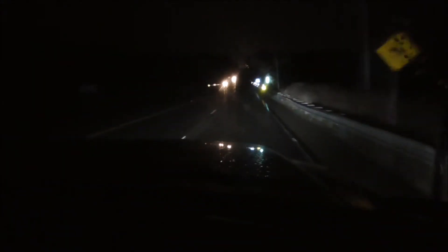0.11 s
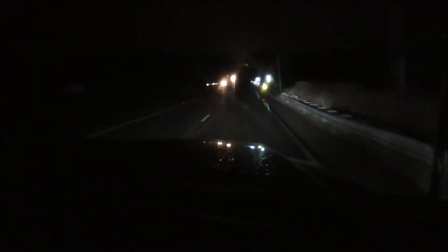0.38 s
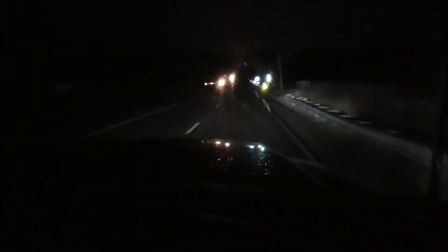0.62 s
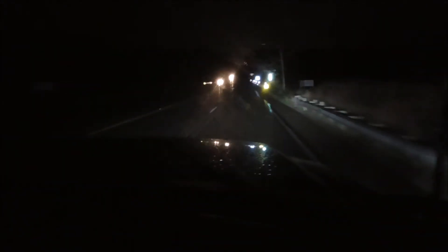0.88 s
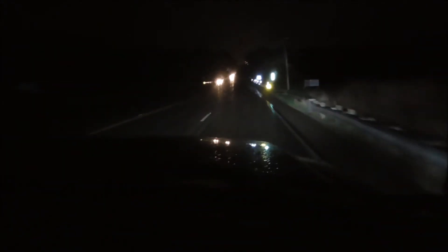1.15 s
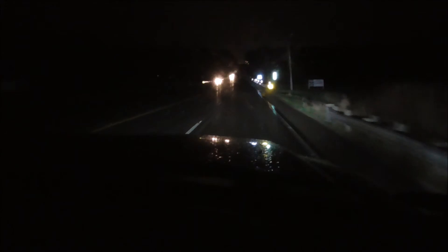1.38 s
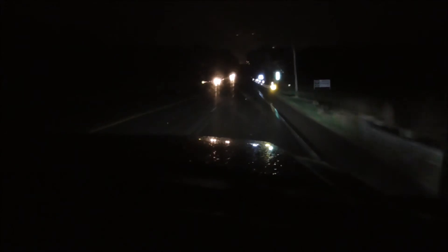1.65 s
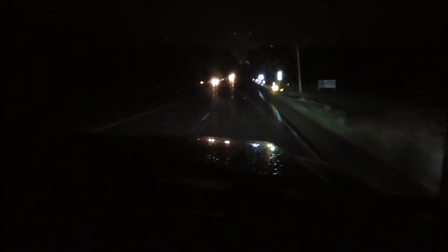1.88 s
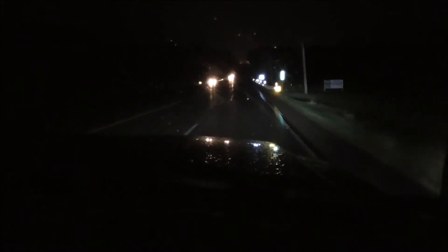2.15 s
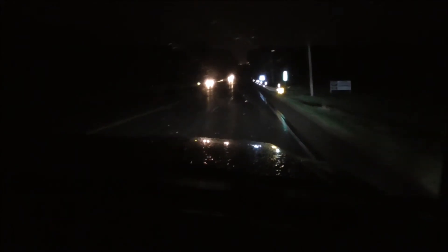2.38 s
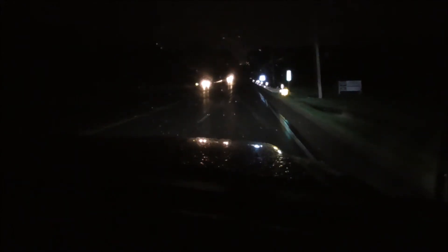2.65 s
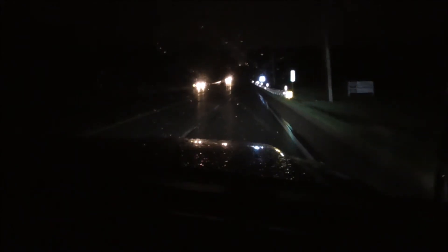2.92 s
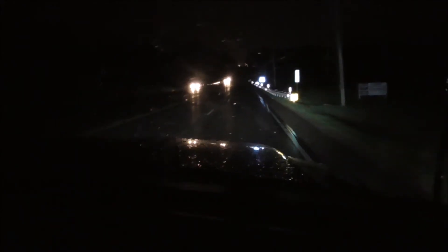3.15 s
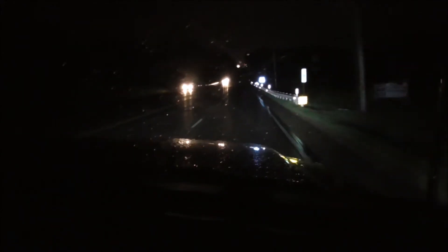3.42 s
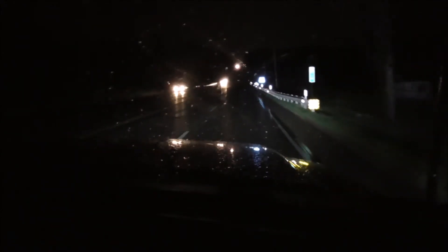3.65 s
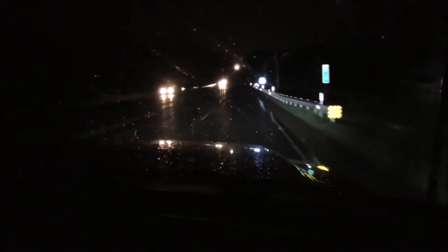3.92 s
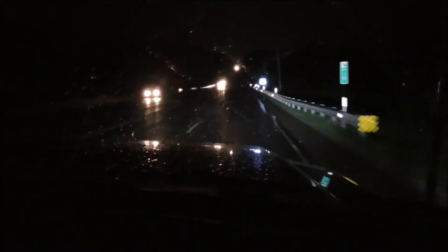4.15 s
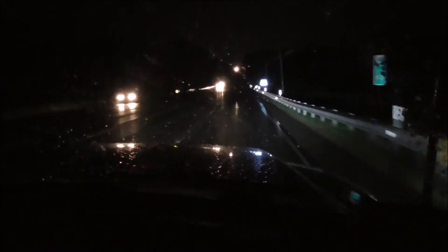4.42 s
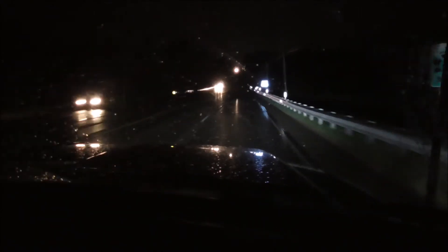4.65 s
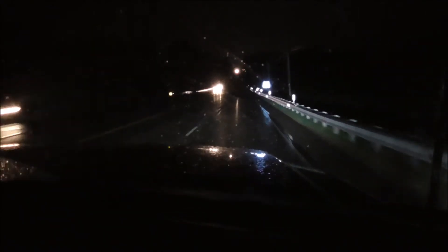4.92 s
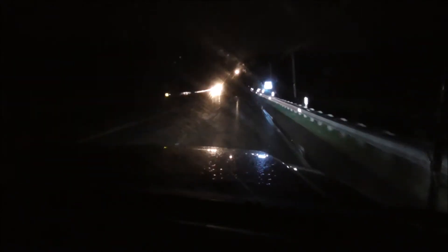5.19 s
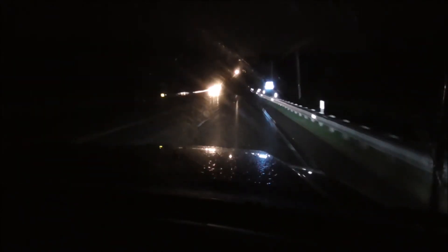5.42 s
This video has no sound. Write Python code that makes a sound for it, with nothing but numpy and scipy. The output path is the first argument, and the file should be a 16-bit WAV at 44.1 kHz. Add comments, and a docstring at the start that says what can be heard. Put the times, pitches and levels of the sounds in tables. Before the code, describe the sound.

Heard from inside a pickup cab with a close stereo microphone, a diesel pulls hard uphill. Its thick, steady drone rises very slightly, then slides down about a tone near four seconds as the gearbox shifts up. Low tyre rumble and soft wet-road hiss lie underneath, with one dull bump early on.

```python
"""Inside a pickup cab on a wet road, two microphone ports: a V8 diesel pulls a load uphill and shifts up.
The exhaust drones on the firing note and its cycle orders, sines that drop in pitch at the shift.
The driveline hums in sines at road speed; the turbo whistles and a squeak are thin wavering sines.
Under the floor tyres rumble and hiss in coloured stereo noise, with short splashes; one soft bump booms."""
import sys
import numpy as np
from scipy import signal
from scipy.fft import rfft, irfft
from scipy.io import wavfile
from scipy.ndimage import uniform_filter1d

SR = 44100
rng = np.random.default_rng(int(sys.argv[2]) if len(sys.argv) > 2 else 0)


def transcribe(u):
    """Save the signal u as a 16-bit wav file named by the first command-line argument.

    u: samples, shape (n,) or (channels, n), limited to [-1, 1]; the rate is SR.
    q: integer samples, one column per channel.
    """
    v = np.clip(np.atleast_2d(u).T, -1, 1)
    q = np.round(v * 32767).astype(np.int16)
    wavfile.write(sys.argv[1], SR, q)


def elevation(decibels):
    """Turn decibel levels (scalar or array-like) into linear amplitude ratios."""
    levels = np.asarray(decibels, float)
    return 10 ** (levels / 20)


N = 244755


def in_time(rows):
    """Table columns as curves, sample by sample."""
    s, *columns = np.transpose(rows)
    return [np.interp(np.arange(N) / SR, s, c) for c in columns]


def at_hz(points, hz):
    """Read a spectrum on a log-frequency axis."""
    points = np.array(points, float)
    log_hz = np.log(np.maximum(hz, 1))
    return np.interp(log_hz, np.log(np.maximum(points[:, 0], 1)), points[:, 1])


def drift(rate):
    """Random wander of spread 1: noise through two equal poles at `rate` Hz, one value per 40 samples."""
    r = np.exp(-80 * np.pi * rate / SR)
    noise = rng.standard_normal(N // 40 + 2002)
    slow = signal.lfilter([1], [1, -2 * r, r * r], noise)[2000:]  # leave out the filter's start
    slow = (slow - slow.mean()) / slow.std()
    return np.interp(np.arange(N) / 40, np.arange(len(slow)), slow)


def tone(phase, db, pan_db, lead):
    """A sine of given rms level, split in level and phase between the two microphone ports."""
    side = np.array([[.5], [-.5]])
    start = rng.uniform(0, 2 * np.pi)
    return np.sqrt(2) * elevation(db) * elevation(pan_db * side) * np.sin(phase + start + lead * side)


def gliding(hz, db, waver_db, waver_rate, wobble_hz, pan_db, lead):
    """A tone that follows its pitch and level curves, wavering a little in both."""
    phase = 2 * np.pi * np.cumsum(hz + wobble_hz * drift(waver_rate)) / SR
    return tone(phase, db + waver_db * drift(waver_rate), pan_db, lead)


# noise likeness of the left and right ports: [f/Hz, likeness 0 to 1]
LIKENESS = [(30, .99), (130, .995), (340, .92), (520, .66), (700, .65), (1400, .68), (3000, .66),
            (4500, .62), (6000, .3), (7500, .4), (9000, .4), (12000, .25)]
# phase of the left port ahead of the right: [f/Hz, lead/rad]
LEAD = [(30, 0.05), (110, 0.1), (340, 0.3), (690, -0.2), (1460, -0.3), (2930, -0.1), (6800, 0.2),
        (8100, -0.6), (8700, -1.9), (9820, -3.1), (12100, -3.4), (13400, -0.4)]
# level of the left port over the right: [f/Hz, level/dB]
LEAN = [(60, 0.3), (200, 0), (370, 1.5), (690, 0.5), (1270, -1), (2330, 0.7), (4290, 0.5), (7900, 2),
        (14500, 1)]


def stereo_noise(spectrum):
    """Spectrum of coloured noise at the two ports, with their likeness, lean and lead; rms 1."""
    hz = np.arange(N // 2 + 1) * SR / N
    a, b = rfft(rng.standard_normal((2, N)))
    alike = np.clip(at_hz(LIKENESS, hz), 0, 1)
    port = elevation(at_hz(LEAN, hz) / 2) * np.exp(.5j * at_hz(LEAD, hz))
    left = a * port
    right = (alike * a + np.sqrt(1 - alike ** 2) * b) / port
    inside = (hz > spectrum[0][0] / 2) & (hz < spectrum[-1][0])
    pair = np.array([left, right]) * elevation(at_hz(spectrum, hz)) * inside
    return hz, pair / irfft(pair, N).std()


# firing note: [t/s, f/Hz, level/dB]
FIRING_NOTE = [(0, 168.4, -16), (.4, 169.2, -16.3), (.6, 171.5, -15.4), (.8, 172.8, -15.1),
               (1.2, 173.8, -15.8), (1.8, 175.1, -15.3), (2.2, 175.4, -15.8), (2.4, 175.7, -14.6),
               (2.8, 176.3, -14.7), (3.4, 176.5, -14.4), (3.5, 174.7, -15.3), (3.69, 174.5, -14.6),
               (3.86, 165.8, -16.7), (4.0, 159.6, -17.2), (4.1, 153.5, -19.8), (4.22, 154, -16.9),
               (4.34, 155.4, -17.1), (4.63, 154.5, -17.5), (4.85, 156.2, -18), (4.98, 154.4, -17.6),
               (5.3, 155.7, -18), (5.55, 155.8, -18)]
# load: [t/s, stage (0 gathering speed, 1 near full speed, 2 next gear), level/dB added to every order]
LOAD_STAGE = [(0, 0.24, 2.5), (0.8, 0, -0.5), (2.3, 1, 0), (3.7, 0.8, 0), (3.9, 0.6, 2), (4.04, 2, -1.5),
              (4.3, 2, 2), (5.55, 2, 0.5)]
# uneven cylinders, the clearest multiples of the cycle rate:
# [order, level/dB in stage 0, level/dB in stage 1, level/dB in stage 2], before the load's addition
CYCLE_ORDERS = [(3, -41, -42, -54), (4, -61, -57, -49), (5, -32, -39, -43), (6, -52, -53, -40),
                (7, -46, -46, -39), (9, -46, -51, -36), (10, -38, -32, -28), (11, -32, -38, -33),
                (12, -39, -36, -45), (13, -32, -36, -40), (14, -50, -49, -41), (15, -48, -56, -41),
                (16, -49, -49, -41), (17, -48, -52, -48), (18, -55, -52, -51), (19, -53, -55, -45),
                (21, -51, -49, -47), (23, -53, -61, -50), (24, -56, -49, -58), (26, -65, -57, -50),
                (27, -62, -73, -53), (29, -65, -63, -57), (30, -55, -60, -61), (32, -63, -57, -65),
                (37, -64, -63, -58), (39, -66, -63, -56), (40, -54, -62, -64), (42, -69, -75, -60),
                (48, -70, -63, -68), (49, -71, -69, -63)]
# cab modes place each order between the ears: [f/Hz, left-right level/dB, left lead/rad]
CAB_SIDES = [(60, 0, .1), (180, 0, .2), (195, 1, .4), (220, -1, .2), (255, 1, .3), (283, 6, .25),
             (305, 0, .3), (330, 0, .5), (347, -2, 1.4), (370, 3, -.1), (412, 5, .4), (455, 0, .2),
             (500, 2, 0), (527, -5, -.6), (570, 2, 0), (700, 4, -1), (760, 5, -.5), (860, 2, 1),
             (1100, 0, -.4)]
# the other orders from 20 to 56 fall off evenly, each with its own chance level per stage
UPPER_DB, UPPER_FALL_DB_PER_ORDER, UPPER_SPREAD_DB = -61, .35, 3.0
SHIFT_JITTER_RAD_PER_HZ_S = .006  # firing turns uneven as revs fall: cycle jitter per Hz/s of fall


def engine():
    """The firing note is clean; cylinder-to-cylinder differences fill in multiples of an eighth of it."""
    firing_hz, firing_db = in_time(FIRING_NOTE)
    cycle_hz = uniform_filter1d(firing_hz, size=SR // 8) / 8  # the cycle rate follows the firing note smoothly, averaged over an eighth of a second
    fall_hz_s = np.maximum(-np.gradient(cycle_hz) * SR, 0)
    jitter = SHIFT_JITTER_RAD_PER_HZ_S * fall_hz_s * drift(25.0)
    cycle = 2 * np.pi * np.cumsum(cycle_hz) / SR + jitter
    stage, load_db = in_time(LOAD_STAGE)
    cab_hz, cab_pan_db, cab_lead = np.transpose(CAB_SIDES)

    levels = {}
    for order in range(20, 57):
        even_db = UPPER_DB - UPPER_FALL_DB_PER_ORDER * (order - 20)
        levels[order] = even_db + UPPER_SPREAD_DB * rng.standard_normal(3)
    levels.update({order: dbs for order, *dbs in CYCLE_ORDERS})

    out = gliding(firing_hz, firing_db, .5, 18.0, .15, 0.1, .16)
    for order, dbs in levels.items():
        db = np.interp(stage, np.arange(3), dbs) + load_db + 1.2 * drift(2.5)
        phase = order * cycle + .15 * drift(3.0)
        hz = order * cycle_hz
        pan_db = np.interp(hz, cab_hz, cab_pan_db)
        out += tone(phase, db, pan_db, np.interp(hz, cab_hz, cab_lead))
    return out


# main driveline hum: [t/s, f/Hz, level/dB]
SHAFT = [(0, 218.9, -30), (.2, 219.6, -27.8), (.6, 220.4, -27.8), (1.1, 222.8, -27.5), (1.6, 223.2, -26.6),
         (2.04, 225, -24.9), (2.5, 227, -27.5), (3.0, 229, -28.5), (3.35, 229.6, -28.8),
         (3.52, 228.6, -30.2), (3.7, 230, -31.8), (4.07, 231.1, -27.8), (4.3, 231.1, -29),
         (4.46, 231.8, -27), (4.62, 232.1, -20.8), (4.81, 232.4, -20.6), (5.0, 232.7, -23),
         (5.55, 233.4, -21.4)]
AXLE_RATIO = 1.2155  # second, fainter hum at road speed, as a multiple of the first
AXLE_DB, AXLE_GAIN_IN_NEXT_GEAR_DB = -37.5, 3.5


def driveline():
    """Two hums and a faint deep throb that follow road speed and carry on through the shift."""
    hz, db = in_time(SHAFT)
    next_gear = np.clip(in_time(LOAD_STAGE)[0] - 1, 0, 1)
    axle_db = AXLE_DB + AXLE_GAIN_IN_NEXT_GEAR_DB * next_gear
    shaft = gliding(hz, db, 1.1, 12.0, .3, -0.3, .3)
    axle = gliding(AXLE_RATIO * hz, axle_db, 2.0, 6.0, .4, 0.3, .15)
    throb_phase = 2 * np.pi * np.cumsum(hz) / SR / 9
    throb = tone(throb_phase, -56 + 3.5 * drift(6.0), 0, 0)
    return shaft + axle + throb


# floor rumble: [t/s, level/dB]
FLOOR = [(0, -34), (1.0, -32.5), (2.0, -34.5), (3.0, -35), (3.6, -36.5), (3.95, -29.5), (4.3, -28.5),
         (4.8, -34.5), (5.55, -31)]
# rumble colour, relative: [f/Hz, level/dB per Hz]
RUMBLE = [(24, -20), (32, -23), (40, -20), (50, -15), (65, -7.5), (85, -8.5), (110, -5.5), (140, -5.5),
          (180, -9.5), (230, -6), (280, -3.5), (340, -14), (400, -19), (520, -23.5), (640, -31.5)]


def floor_rumble():
    """Tyre rumble through the floor: low coloured noise, slowly swelling and easing."""
    hz, rumble = stereo_noise(RUMBLE)
    return elevation(in_time(FLOOR)[0] + 1.0 * drift(2.1)) * irfft(rumble, N)


# tyre hiss, as the level of its whole spectrum before splashes: [t/s, level/dB]
ROAD = [(0, -42.5), (1.28, -44.5), (2.23, -46), (2.48, -44), (3.3, -47), (3.73, -45), (3.98, -44.5),
        (4.28, -38), (4.53, -41), (4.77, -41.5), (5.41, -39.5), (5.55, -40.5)]
# hiss and spray colour, relative: [f/Hz, level/dB per Hz]
HISS = [(400, -2.5), (640, -10), (1000, -11.5), (1400, -14), (1800, -27), (2500, -31), (3500, -32.5),
        (5000, -36.5), (6000, -41), (7000, -35.5), (8200, -32), (9500, -36.5), (11500, -44), (13000, -46.5),
        (15000, -59.5)]
# short surges of hiss and spray, as from a puddle: [t/s of the peak, level/dB above the road]
SPLASHES = [(2.24, 3.5), (2.44, 2.5), (3.27, 3), (4.56, 2), (4.91, 2.5)]
SPLASH_RISE_S, SPLASH_FALL_S = 0.023, 0.023
SPRAY_OVER_HISS_DB = 1.6  # spray against the hiss spectrum
SPRAY_FOLLOWS = .7  # share of the hiss's swing in dB


def tyre_hiss():
    """Wet tyres under the floor: hiss below 1.8 kHz, spray above it coming in brief spurts."""
    t, (hiss_db,) = np.arange(N) / SR, in_time(ROAD)
    splash_db = np.zeros(N)
    for s, db in SPLASHES:
        rise, fall = 1 + (t - s) / SPLASH_RISE_S, 1 - (t - s) / SPLASH_FALL_S
        splash_db += db * np.clip(np.minimum(rise, fall), 0, 1)
    swing_db = hiss_db - hiss_db.mean()
    spray_db = hiss_db.mean() + SPRAY_FOLLOWS * swing_db + SPRAY_OVER_HISS_DB + splash_db

    hz, hiss = stereo_noise(HISS)
    out = elevation(hiss_db + splash_db) * irfft(hiss * (hz < 1800), N)
    spurts = drift(60.0)  # shared by all spray bands
    edges = [1800, 3500, 6500, 10000, SR]
    for low, high in zip(edges, edges[1:]):
        flicker_db = 1.4 * spurts + .4 * drift(30.0)
        out += elevation(spray_db + flicker_db) * irfft(hiss * (hz >= low) * (hz < high), N)
    return out


# turbo whistle: [t/s, f/Hz, level/dB]
TURBO = [(0, 7870, -71), (.22, 7927, -67.5), (.67, 8105, -74), (1.0, 8238, -65.5), (1.12, 8280, -72),
         (1.3, 8348, -69), (1.45, 8402, -73), (1.66, 8462, -68), (2.0, 8545, -81), (2.2, 8579, -73),
         (2.4, 8614, -64), (2.62, 8640, -60.5), (3.0, 8680, -62.5), (3.33, 8710, -63), (3.55, 8682, -63.5),
         (3.77, 8660, -61.5), (3.88, 8613, -64.5), (3.97, 8550, -73), (4.22, 8372, -73.5),
         (4.32, 8305, -65.5), (4.6, 8200, -67.5), (4.88, 8120, -75), (5.25, 8090, -68), (5.55, 8085, -80)]
# a second thin whistle that the turbo climbs into: [t/s, f/Hz, level/dB]
WHINE = [(0, 8530, -88), (0.15, 8545, -72), (1.0, 8585, -69), (1.1, 8590, -75), (1.6, 8620, -72),
         (2.0, 8640, -90), (5.55, 8640, -110)]


def turbo_whistles():
    """Two thin high gliding tones, flickering in level and pitch."""
    turbo = gliding(*in_time(TURBO), 2.5, 50.0, 3.0, 2.5, -1.1)
    whine = gliding(*in_time(WHINE), 2.5, 40.0, 4.0, 2.5, -1.3)
    return turbo + whine


# a thin squeak comes and goes: [start t/s, length t/s, level/dB]
SQUEAK = [(1.98, .16, -73), (2.35, .13, -75), (2.87, .25, -75), (3.55, .05, -73), (3.98, .25, -70),
          (4.24, .1, -65), (4.36, .15, -69.5), (4.52, .08, -65), (4.62, .4, -72), (5.19, .09, -72)]
SQUEAK_HZ, SQUEAK_FADE_DB_PER_S = 3266, 250


def squeak():
    """One thin wavering tone that fades in and out around each of its appearances."""
    t = np.arange(N) / SR
    curves = []
    for s, length, db in SQUEAK:
        outside_s = np.maximum(np.maximum(s - t, t - s - length), 0)
        curves.append(db - SQUEAK_FADE_DB_PER_S * outside_s)
    return gliding(SQUEAK_HZ, np.max(curves, axis=0), 2.5, 30.0, 8.0, 0.3, -.1)


# wheel over a joint: [t/s, level/dB of the decay at its start, body f/Hz, 60 dB decay t/s]
BUMPS = [(1.1, -24.5, 66.6, 0.45)]


def bumps():
    """A soft blow sets the body booming: a decaying sine with a 13 ms rise, alike at both ports."""
    out = np.zeros(N)
    for s, db, hz, t60 in BUMPS:
        t = np.maximum(np.arange(N) / SR - s, 0)
        out += elevation(db - 60 * t / t60) * (1 - np.exp(-t / 0.013)) * np.sin(2 * np.pi * hz * t)
    return out


def scene():
    """All sources as heard in the cab."""
    return engine() + driveline() + floor_rumble() + tyre_hiss() + turbo_whistles() + squeak() + bumps()


def top_cut(x):
    """Nothing passes above the cut-off."""
    return signal.sosfilt(signal.butter(12, 15130, fs=SR, output="sos"), x)


def record(dry):
    """The finished mix, with a soft start of 2 ms."""
    soft_start = np.minimum(np.arange(N) / SR / .002, 1)
    return top_cut(dry * soft_start)


dry = scene()
out = record(dry)
transcribe(out)
```